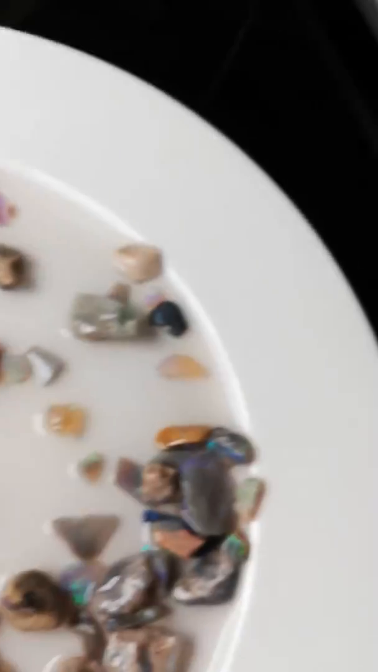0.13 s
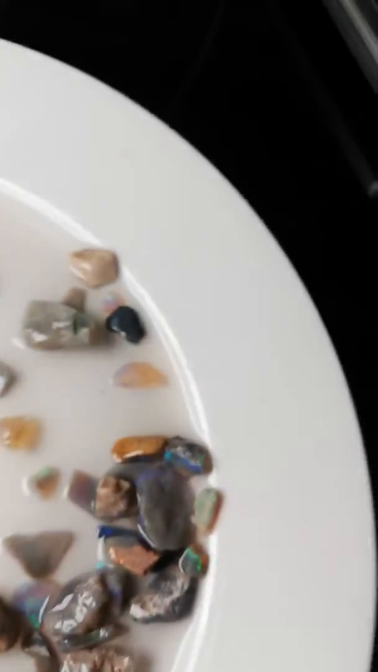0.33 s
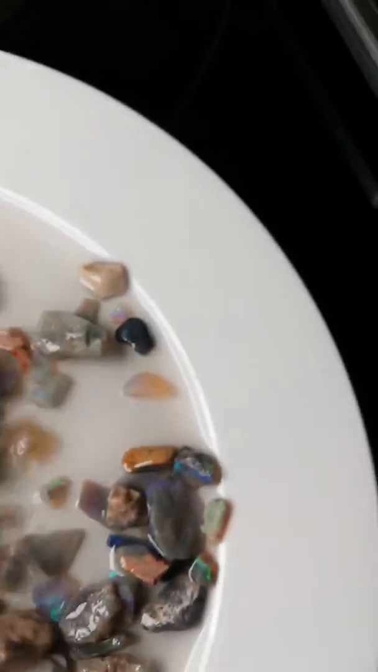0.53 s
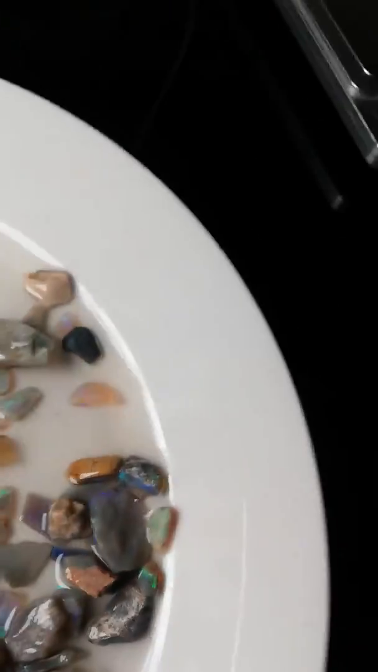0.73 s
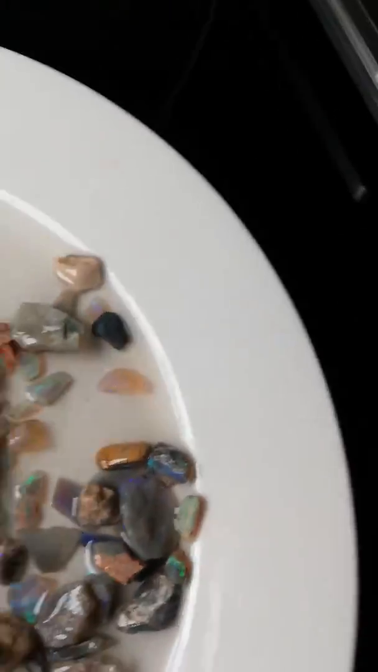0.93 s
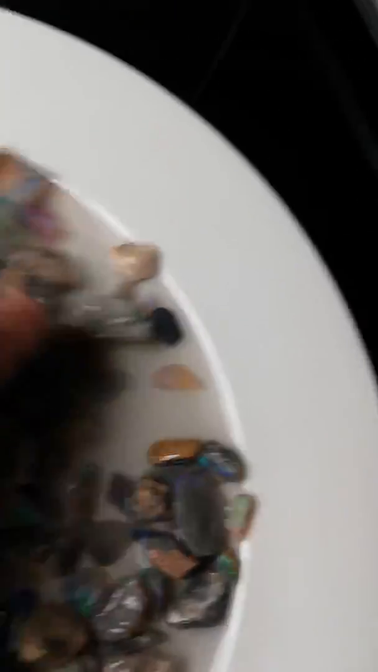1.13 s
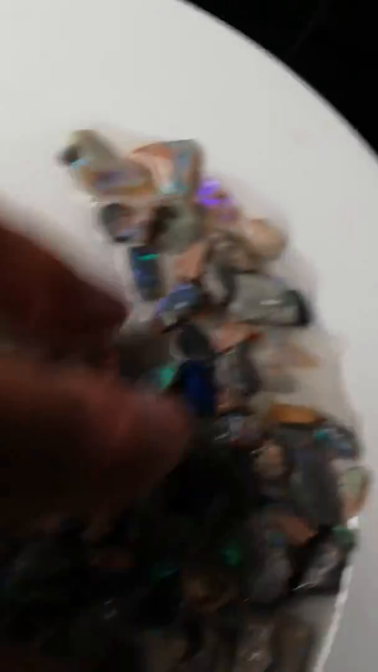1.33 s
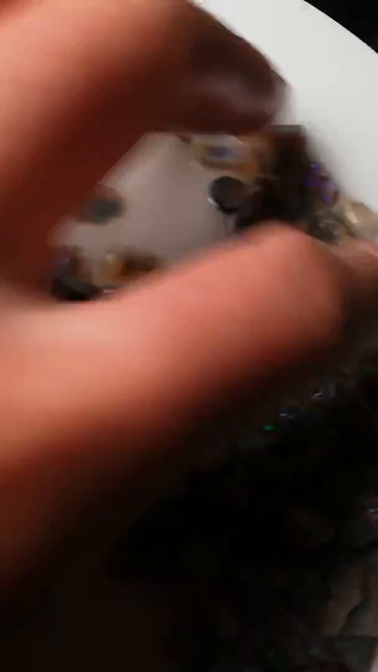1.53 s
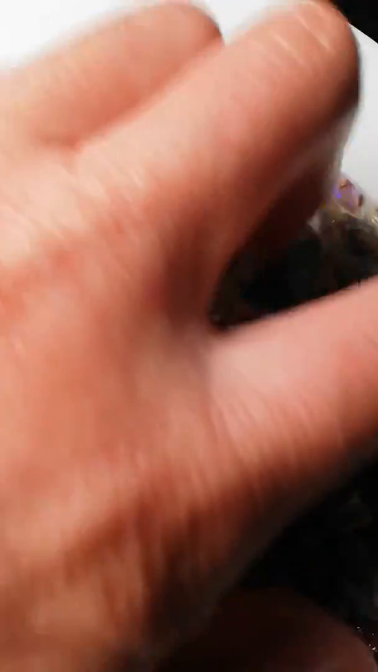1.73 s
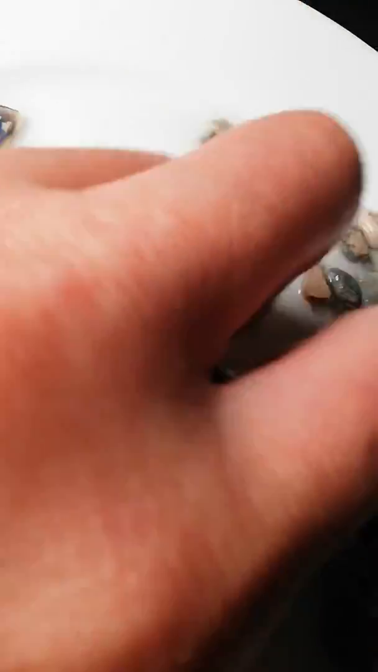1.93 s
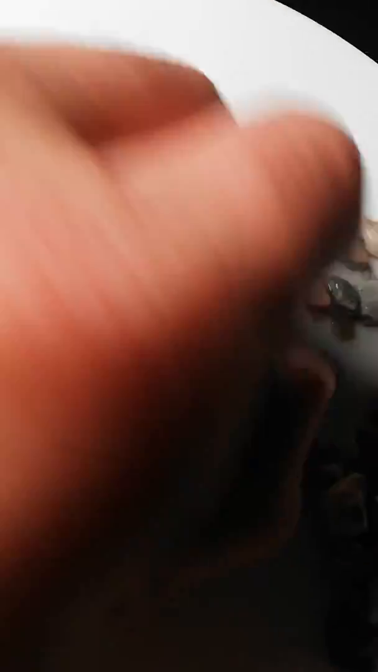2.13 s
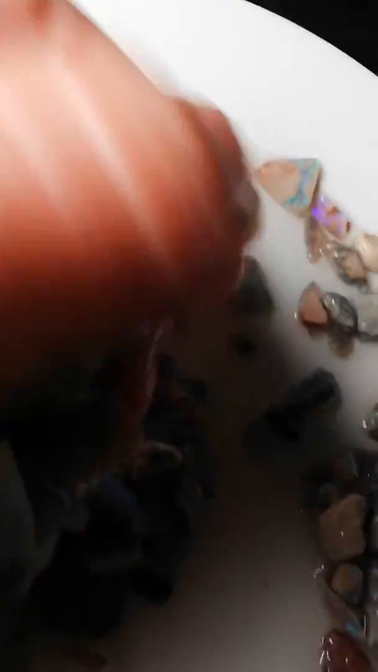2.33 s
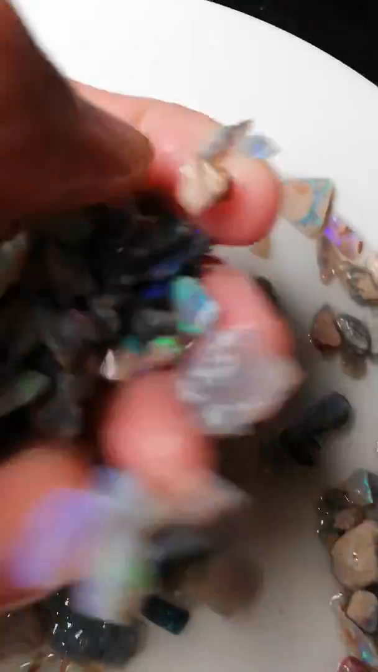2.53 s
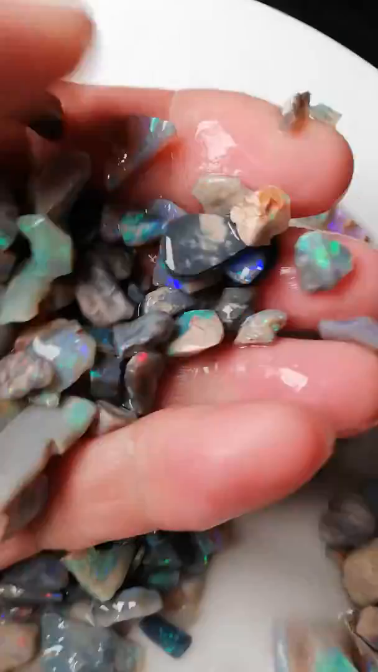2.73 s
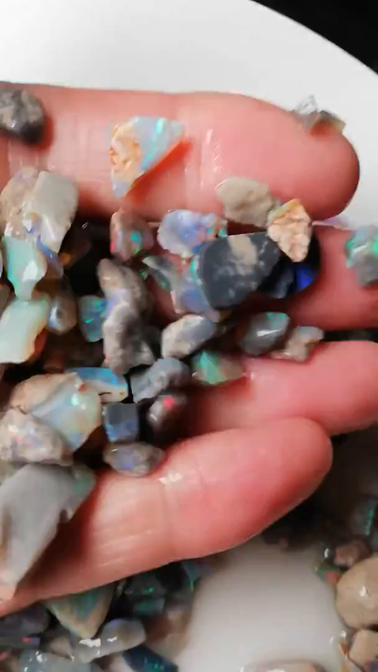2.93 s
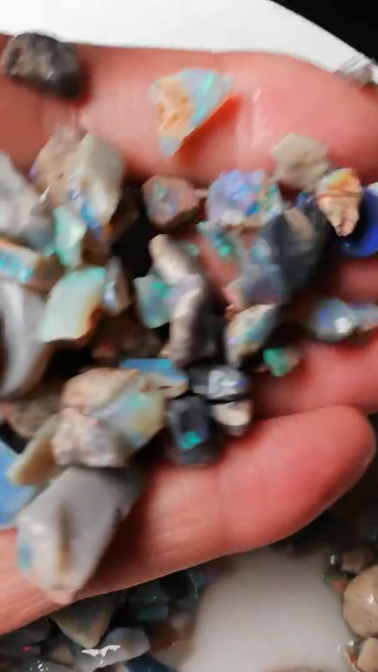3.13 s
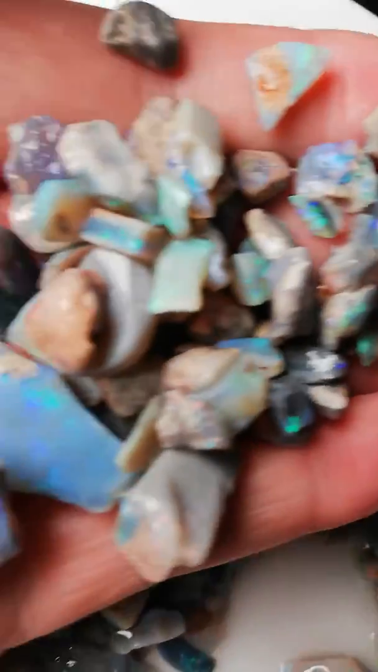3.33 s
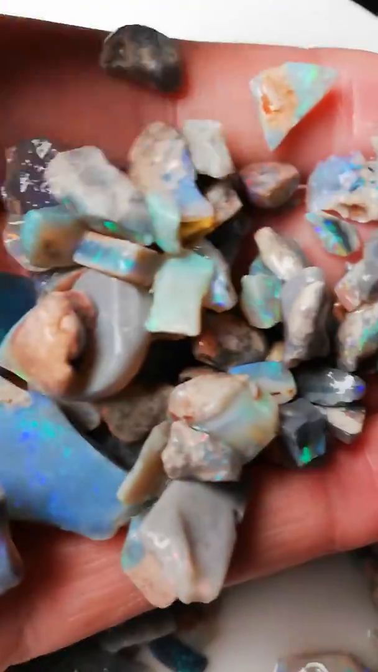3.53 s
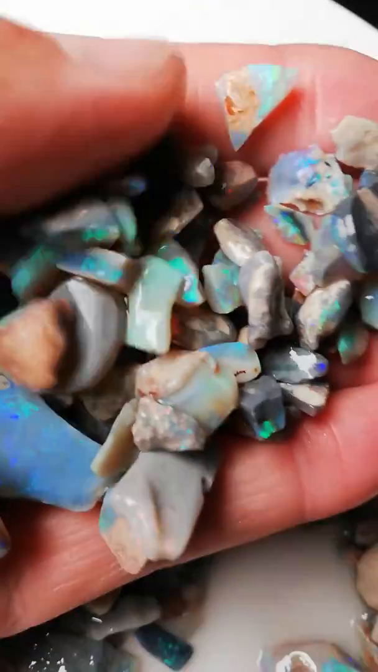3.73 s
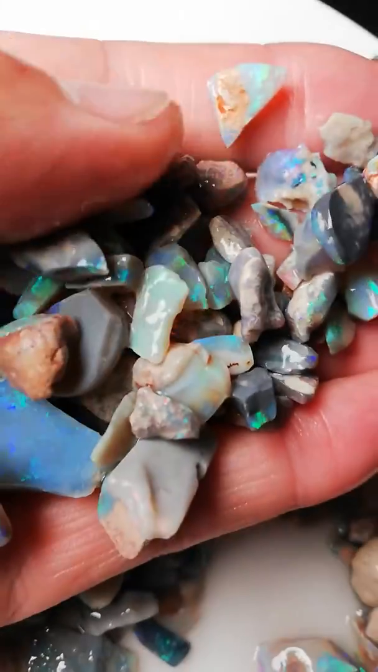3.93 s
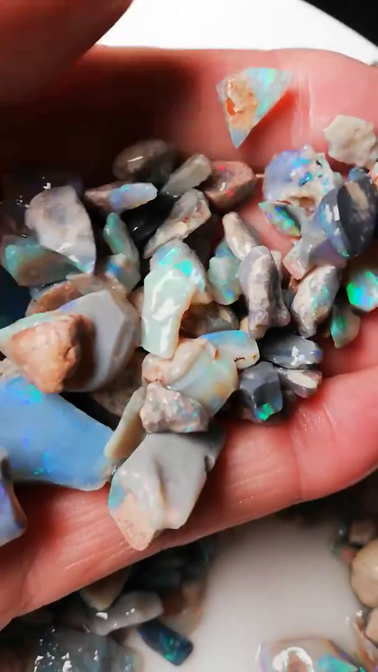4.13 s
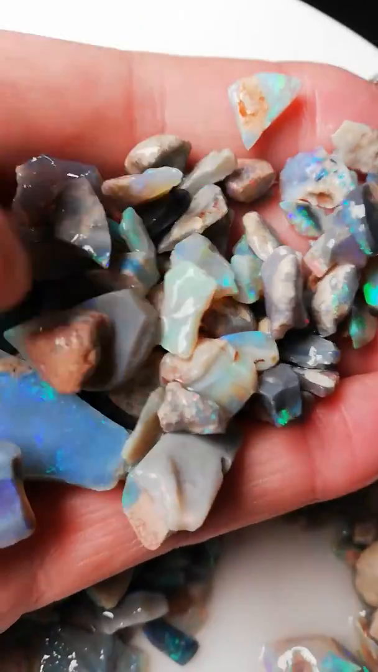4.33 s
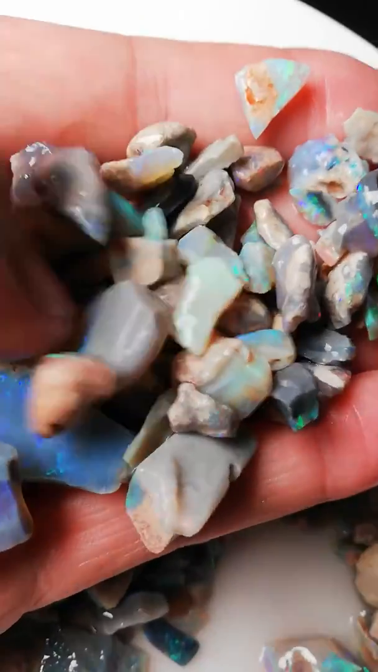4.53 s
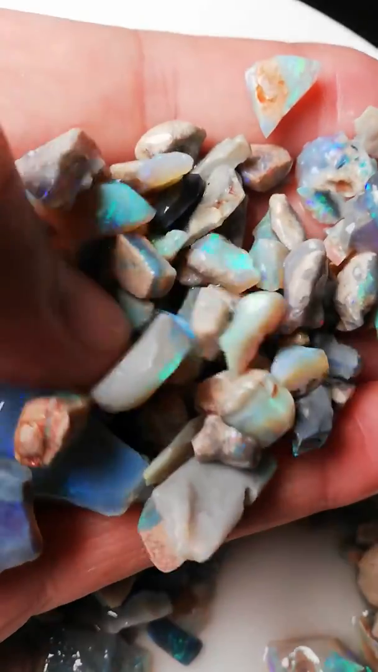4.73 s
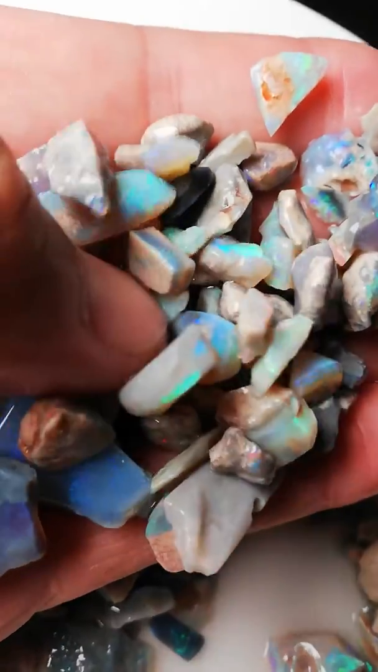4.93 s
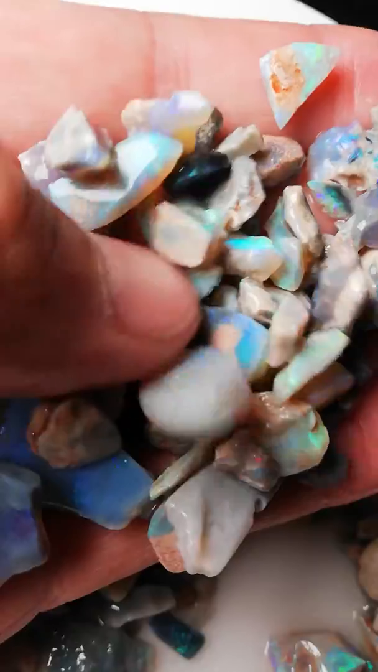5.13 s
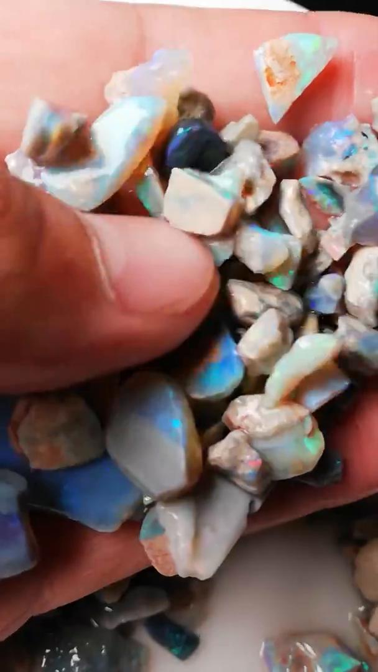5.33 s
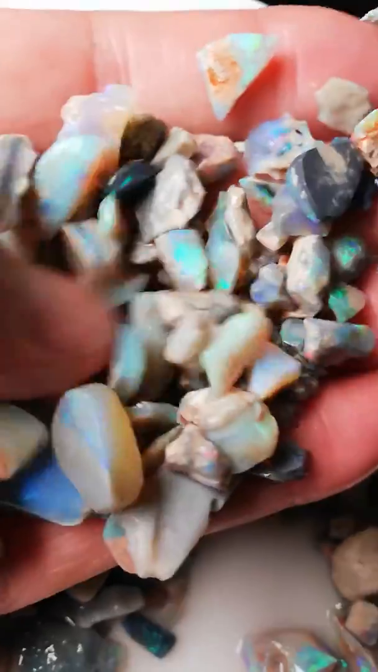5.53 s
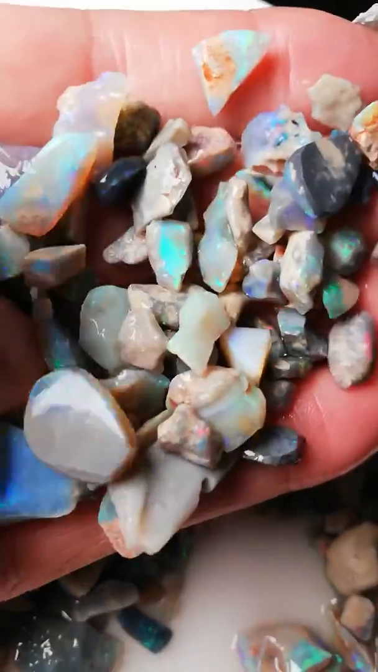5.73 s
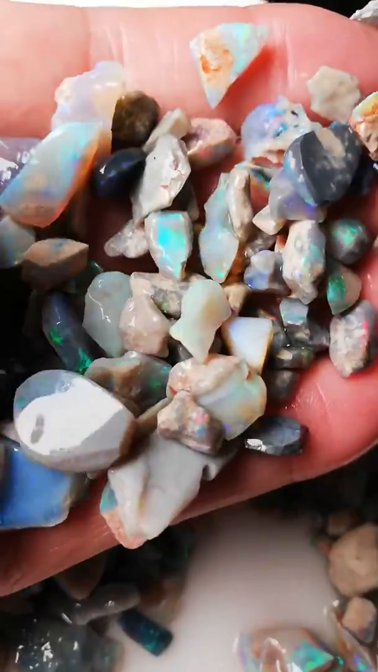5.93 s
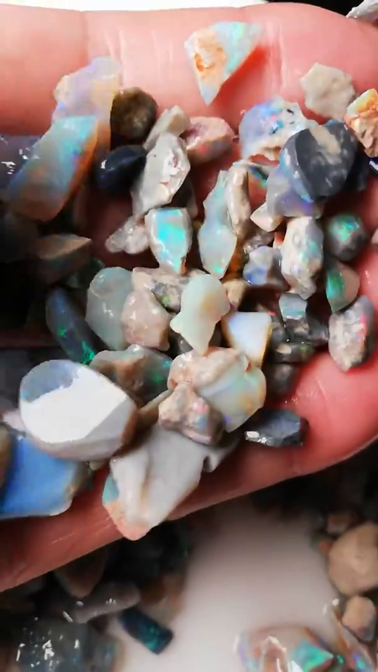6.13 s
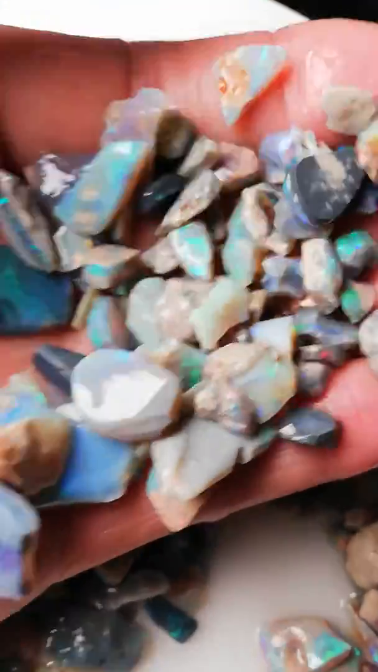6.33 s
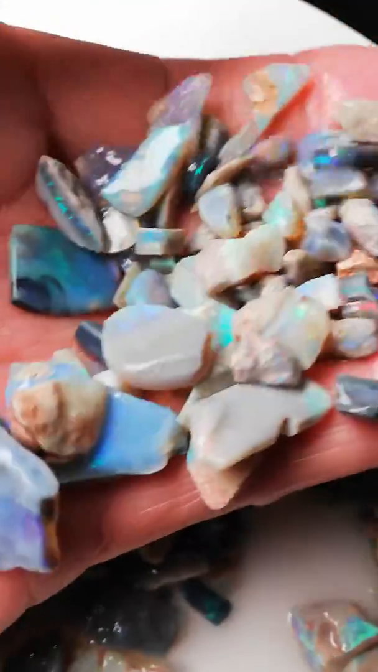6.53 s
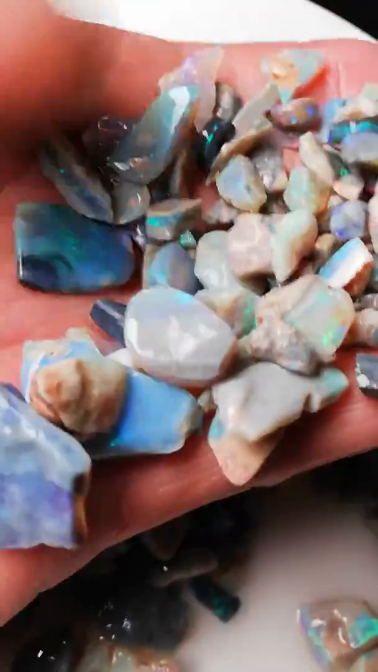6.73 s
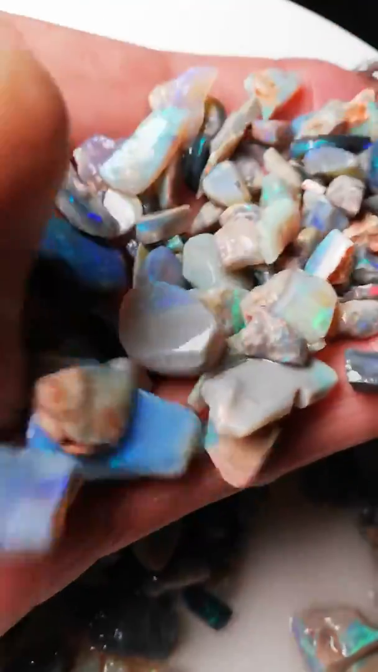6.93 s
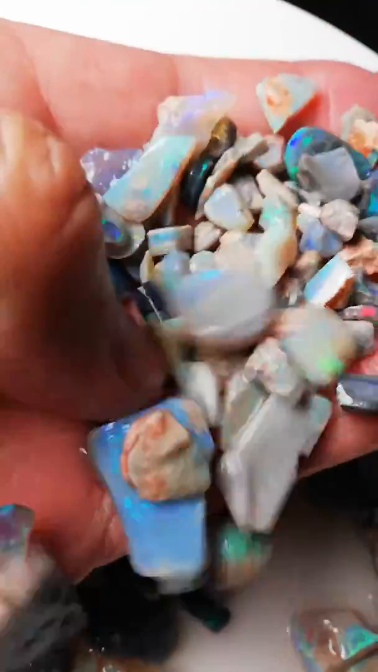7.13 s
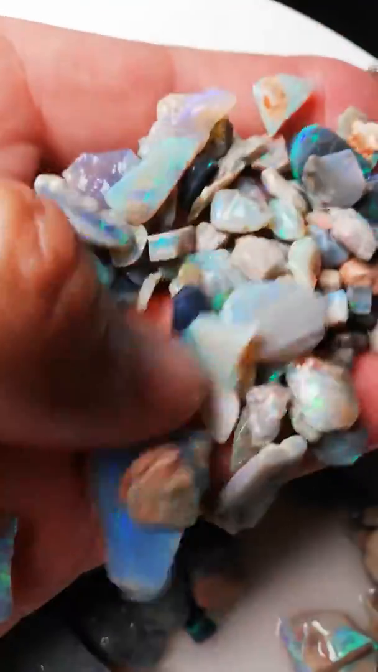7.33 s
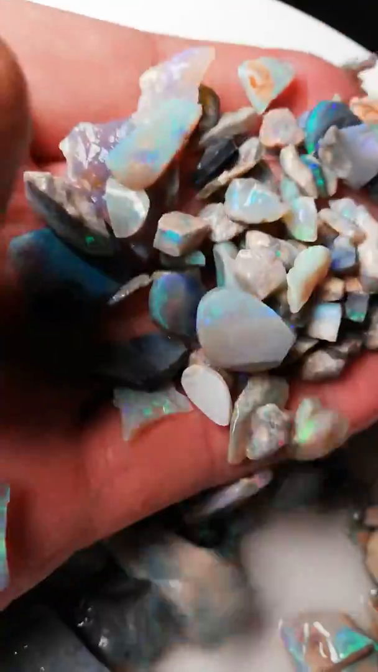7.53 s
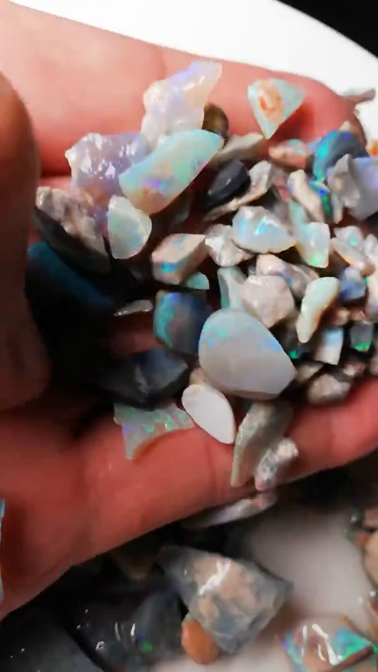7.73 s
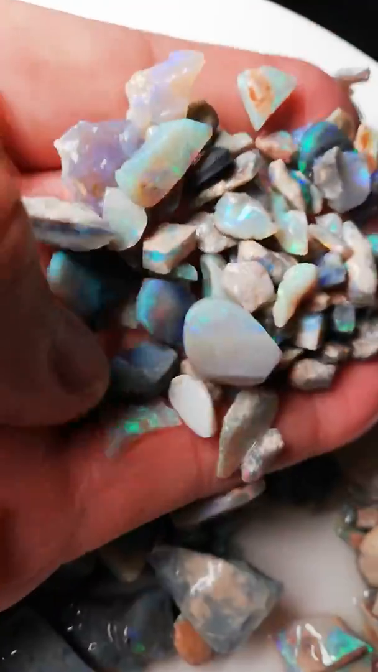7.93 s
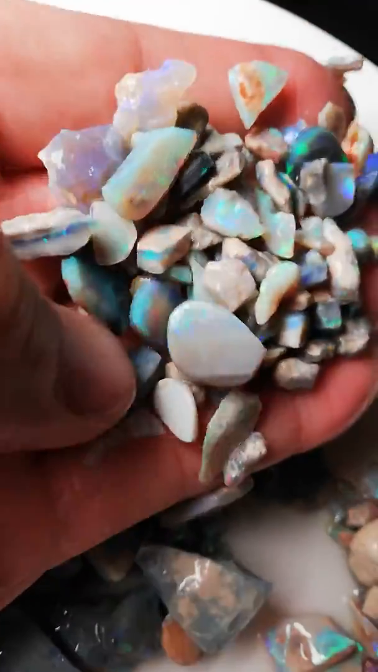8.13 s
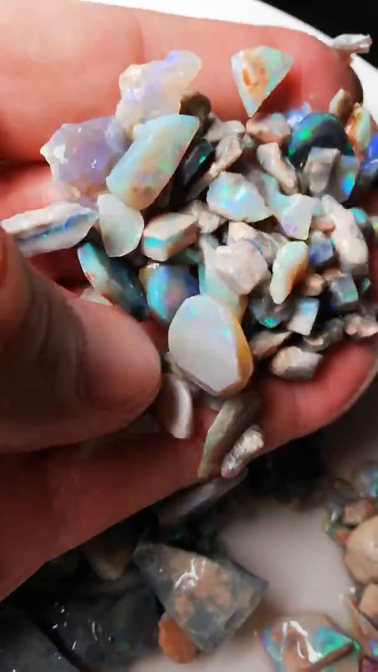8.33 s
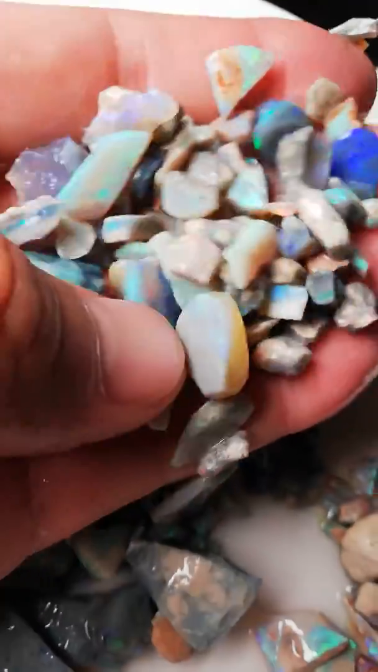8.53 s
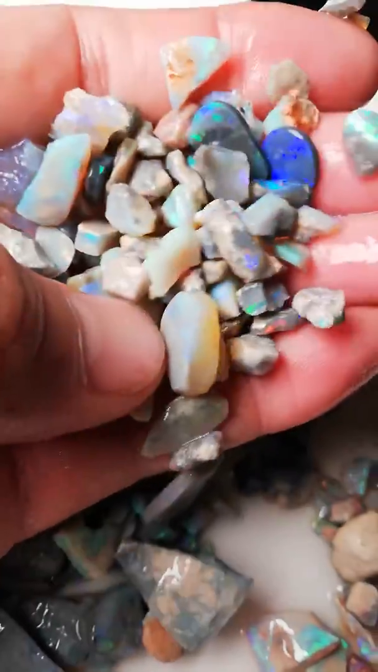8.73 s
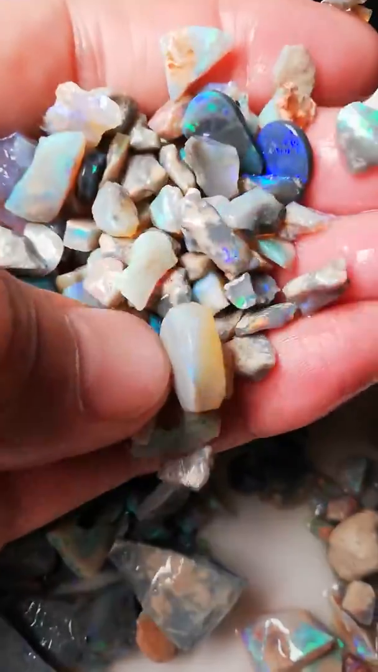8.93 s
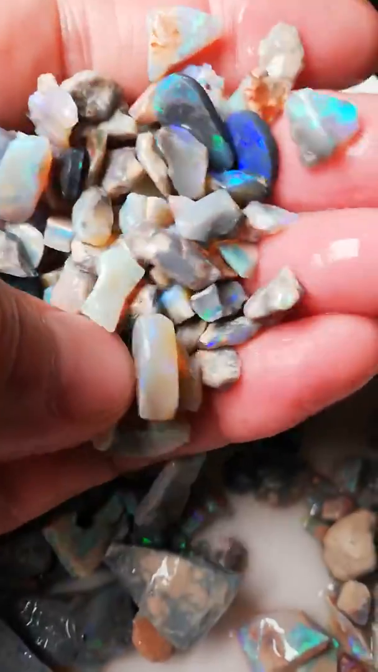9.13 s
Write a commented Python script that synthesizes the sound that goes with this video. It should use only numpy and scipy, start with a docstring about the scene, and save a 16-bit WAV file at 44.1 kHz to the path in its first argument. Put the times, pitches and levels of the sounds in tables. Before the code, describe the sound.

Close to the microphone in a quiet room, a hand sweeps up a heap of little stones, which scrape, rattle and fall clinking on a ceramic plate. The busy clatter gives way to delicate, high clicks and brief gritty rustles as the handful is rolled in the palm. Late on, a short spill strikes the plate loudly, then the soft stirring resumes and a last few pieces land lightly.

```python
"""Small hard stones are pushed over a ceramic plate, scooped up and stirred in a palm.
They tick against each other; those that slide or drop on the plate ring its many short modes,
and the table rumbles under the push. Heard close up in a quiet room,
on a phone's two microphones a hand's width apart."""
import sys
import numpy as np
from scipy import signal
from scipy.fft import rfft, irfft
from scipy.io import wavfile
from scipy.ndimage import uniform_filter1d

SR = 44100
rng = np.random.default_rng(int(sys.argv[2]) if len(sys.argv) > 2 else 0)


def store_wav(level_fs):
    """Save 16-bit WAV to argv[1]."""
    pcm = np.round(np.clip(np.atleast_2d(level_fs), -1, 1) * 32767)
    wavfile.write(sys.argv[1], SR, pcm.T.astype(np.int16))


N = 405279
TIME_S = np.arange(N) / SR
STROKE_STEP_S = 0.002

def amp(db):
    return 10 ** (np.asarray(db) / 20)

def unit_rms(x):
    return x / np.sqrt(np.mean(x ** 2) + 1e-20)

def at_hz(curve, hz):
    curve_hz, value = np.transpose(curve)
    return np.interp(np.log(hz + 1), np.log(curve_hz + 1), value)

def coloured(x, spectrum):
    size = x.shape[-1]
    return irfft(rfft(x) * amp(at_hz(spectrum, np.fft.rfftfreq(size, 1 / SR))), size)

def wander(samples):
    return unit_rms(uniform_filter1d(rng.standard_normal(N), samples))

def burst(spectrum, t60_s, size):
    """A shock of coloured noise at both microphones, dying at once."""
    t = np.arange(size) / SR
    noise = coloured(rng.standard_normal((2, size)), spectrum)
    shock = noise * amp(-60 * t / t60_s) * np.minimum(t / 0.00031, 1)
    return shock / np.linalg.norm(shock[0])

def placed(events, voice):
    """One sound per row, scaled by its peak; pan_db is left minus right throughout."""
    track = np.zeros((2, N))
    for start_s, level_db, pan_db, *timbre in events:
        sound = voice(*timbre)
        sound = amp(level_db) * amp([[pan_db / 2], [-pan_db / 2]]) * sound / abs(sound).max()
        span = track[:, round(start_s * SR):][:, :sound.shape[1]]
        span += sound[:, :span.shape[1]]
    return track

def strokes(start_s, crest_s, end_s, attack, swell, sag, release):
    """One gain curve per stroke; the four slopes are in dB per second."""
    t = np.arange(0, N / SR, STROKE_STEP_S)[:, None]
    rise_db = attack * np.maximum(start_s - t, 0) + swell * np.maximum(crest_s - t, 0)
    fall_db = sag * np.maximum(t - crest_s, 0) + release * np.maximum(t - end_s, 0)
    return amp(-rise_db - fall_db).T

def envelope(shapes, gains):
    """Strokes summed in power, as a gain per sample."""
    total = np.sqrt(((shapes * gains[:, None]) ** 2).sum(0))
    return np.interp(TIME_S, np.arange(len(total)) * STROKE_STEP_S, total)

def rattle(gain, sounds, per_s, spread_db):
    """Random contacts, mostly small; the same few stones keep touching until others take over."""
    strength = amp(spread_db * np.minimum(rng.exponential(1, N), 5))
    hits = gain * unit_rms(strength * (rng.random(N) < per_s / SR))
    spot = 0.33 * wander(round(0.035 * SR)) + 0.08 * rng.standard_normal(N)
    stone = np.floor((spot + 0.5) % 1 * len(sounds))
    return sum(signal.oaconvolve((hits * (stone == k))[None], sound, axes=1)[:, :N]
               for k, sound in enumerate(sounds))

# Room tone spectrum: freq_hz, level_db
ROOM_TONE = [(12, -12.5), (20, -4), (65, -10), (382, -20), (816, -20), (1560, -23.5), (3520, -21),
             (5520, -21.5), (8650, -24.5), (15200, -32), (16500, -49.5)]
# Its likeness between the microphones: freq_hz, correlation
TONE_LIKENESS = [(30, 0.93), (100, .9), (290, -0.25), (640, -0.81), (1400, 1), (6000, -0.055)]
def room_tone():
    """Room air and microphone hiss, nearly alike on both sides in the bass."""
    left, other = rfft(rng.standard_normal((2, N)))
    hz = np.fft.rfftfreq(N, 1 / SR)
    likeness = np.clip(at_hz(TONE_LIKENESS, hz), -1, 1)
    right = likeness * left + np.sqrt(1 - likeness ** 2) * other
    return amp(-64.5) * unit_rms(irfft(np.array([left, right]) * amp(at_hz(ROOM_TONE, hz)), N))

# Modes of the plate: pitch_hz, level_db, base_t60_s
PLATE_MODES = [(830, -20, .06), (1115, -5, .06), (1295, -6, .06), (1840, -10, .05), (2050, -8, .05),
               (2315, -3, .07), (3665, -7, .09), (3910, -4, .1), (4770, -3, .12), (5040, -3, .09),
               (5520, -6, .09), (6030, -6, .06), (6320, -7, .1), (6520, -3.5, .06), (7120, -4, .07),
               (7460, -5, .07), (7760, -2.5, .18), (8960, -8, .07), (9430, -2.5, .12), (9530, -2.5, .12),
               (9990, -4, .07), (11420, -10, .06), (11820, -6, .07), (13750, -20, .05)]
# First shock of stone on ceramic: freq_hz, level_db
CRACK_SPECTRUM = [(290, -64), (500, -60), (1200, -5), (1650, -5.5), (2250, 4.5), (2850, -9), (3500, -4),
                  (7820, -14), (8930, -5.5), (9740, -7), (15100, -18), (16500, -59)]
def plate_ring(low_db, crack_db, hold, favoured_hz=0, favour_db=10, lift_from_hz=0, tuning=1, size=8000):
    """Each spot struck wakes its own mix of modes, and each microphone hears them from its own side."""
    hz, mode_db, t60_s = np.transpose(PLATE_MODES)[:, None, :, None]
    spot, load, side, phase = rng.standard_normal((4, 2, len(PLATE_MODES), 1))
    t = np.arange(size) / SR
    favour = np.exp(-((hz - np.array(favoured_hz)) / 150) ** 2).max(-1, keepdims=True)
    is_low = (hz > lift_from_hz) & (hz < 2800)
    mode_db = mode_db + 4 * spot[:1] + 3 * side + low_db * is_low + favour_db * favour
    hz = hz * tuning * (1 + 0.004 * load[:1])  # stones lying on the plate shift its modes
    drain = 0.31 + 0.45 * favour + amp(-60 * t / 0.01)  # the heap soaks up energy at once
    fade = amp(-60 * t / (hold * t60_s)) * drain
    modes = amp(mode_db) * fade * np.sin(2 * np.pi * hz * t + 1.83 * phase)
    ring = modes.sum(1) * np.minimum(t / 0.00023, 1)
    crack = [(f, db + low_db * (lift_from_hz < f < 2500)) for f, db in CRACK_SPECTRUM]
    return ring / np.linalg.norm(ring[0]) + amp(crack_db) * burst(crack, t60_s=0.038, size=size)

# Stones landing on the plate: start_s, level_db, pan_db, low_lift_db, favoured_hz
LANDINGS = [(0.0996, -11, -7.5, 2.5, 4200), (0.1349, -22, -8, 2, 7000), (0.1609, -20, -4.5, 0, 4660),
            (0.364, -11, -6, 1, 4730), (0.709, -31, 0, 8, 5040), (1.038, -6.5, -4, -6, 4770),
            (1.4494, -7.5, -5.5, -0.5, 6350), (1.4677, -12.5, -18.5, -1.5, 6550),
            (1.6554, -4.5, 0.5, -17.5, 7450), (2.2712, -9, -4, 0, 5650), (2.3224, -16, 1.5, -4, 6500),
            (2.4671, -7, -3, 8.5, 5300), (2.5167, -5, -13, -9, 8350), (2.5579, -2.5, -5.5, -6.5, 4017),
            (2.596, -11, -2.5, -8, 5040), (2.6442, 2, -4.5, -2, 4900), (2.657, -7, -2, -3, 5200),
            (2.6726, -2, -1, -11, 4930), (2.7157, -10, -0.5, -2.5, 3900), (2.748, -9.5, -5.5, -24, 4900),
            (2.779, -9.5, 3, -28, 4920), (2.805, -14.5, 1.5, 2.5, 2315), (2.9329, -3.5, -3, 1.5, 6520),
            (2.9396, -5.5, -7, -21, 7715), (3.014, -11, -11.5, -2.5, 5040), (3.0246, -12, 0, -11, 7770),
            (7.2248, -2, -3, 4.5, 6470), (7.2654, -0.5, -6, 5.5, 7760), (7.2963, -15, -6, -11.5, 7860),
            (7.3057, -12, -6.5, -5.5, 6600), (7.3134, -10.5, -3, -3, 7900), (7.3438, -19.5, 17.5, -6, 7500),
            (7.3546, -8, -9.5, -4, 8000), (7.533, -17, -4, 14, 7530), (7.5466, -13, 2, 15.5, 4840),
            (7.5694, -7.5, -6, 8, 6130), (7.584, -11, -2.5, 9, 2315), (7.6127, -9, -2.5, 3.5, 6030),
            (7.7751, -8.5, 0, 5.5, 5120), (9.0683, -22.5, -2, 13, 7680), (9.0762, -14, 0.5, 2, 9370),
            (9.1166, -13.5, -2.5, 2, 6030), (9.141, -22, -5, -3, 9480), (9.151, -21.5, -2, -2, 9540), ]
def landing(low_db, favoured_hz):
    """A dropped stone cracks on the plate and sets it ringing."""
    return plate_ring(low_db, crack_db=-8, hold=0.85, favoured_hz=favoured_hz, favour_db=8,
                      lift_from_hz=1150)

# Spectrum of the table under the plate: freq_hz, level_db
TABLE_SPECTRUM = [(12, -23), (20, -2), (226, -7), (375, -10), (700, -12.5), (910, -27), (1540, -120)]
def table_thud(*_):
    """The table answers a landing with a low puff."""
    return burst(TABLE_SPECTRUM, t60_s=0.12, size=4000)[:1]

# Course of the rumble: time_s, level_db
PUSH_LEVEL = [(0.301, -90), (0.377, -47.5), (0.79, -79), (0.988, -55), (1.467, -68.5), (1.85, -47.5),
              (1.878, -61), (2.113, -61.5), (2.281, -77.5), (2.68, -64.5), (2.899, -84)]
def table_rumble():
    """The pushed plate makes the table rumble, nearly alike at both microphones."""
    time_s, level_db = np.transpose(PUSH_LEVEL)
    pushing = (TIME_S > time_s[0]) & (TIME_S < time_s[-1])
    common, side = coloured(rng.standard_normal((2, N)), TABLE_SPECTRUM)
    rumble = unit_rms(np.array([common + 0.15 * side, common - 0.087 * side]))
    return amp(np.interp(TIME_S, time_s, level_db)) * pushing * rumble

# Brief surges: small avalanches in the heap, and two dull low taps near 4 s: time_s, lift_db
BRIEF_SURGES = [(.37, 7), (.423, 1.5), (.439, -0.5), (0.478, 5), (0.523, 4), (1.085, 3.5), (1.131, -5),
                (1.215, 2), (1.245, 3), (1.383, 13.5), (1.741, 4), (1.826, 3), (1.866, 0), (1.93, 5.5),
                (2.053, 4), (2.148, 5), (4.024, 6.5), (4.112, 8.5)]
def slipping():
    """The wavering gain of stones that slip unevenly, with brief surges on top."""
    surge_db = sum(db * np.exp(-((TIME_S - time_s) / 0.011) ** 2) for time_s, db in BRIEF_SURGES)
    return amp(surge_db + 1.2 * wander(samples=500))

# The heap moving on the plate; the row near 4 s carries the two dull taps:
# start_s, crest_s, end_s, rattle_db, knock_db, plate_share, pan_db
HEAP_SLIDES = [(0.361, 0.57, 0.58, -27.5, -36.5, 0.95, -4.5), (0.807, 0.85, 0.8, -38.5, -48, 0.94, -5.5),
               (0.951, 1.22, 1.338, -24, -36.5, 0.75, -4), (1.45, 1.48, 1.524, -32.5, -47, 1, -1),
               (1.641, 1.863, 1.894, -24, -36.5, 0.71, -3), (1.91, 2.02, 2.243, -25, -37.5, 0.9, 1),
               (2.317, 2.332, 2.33, -27, -41.5, 0.25, -1.5), (2.459, 2.52, 2.57, -32, -40, 0.95, -2),
               (2.634, 2.73, 2.794, -30.5, -45, 0.97, -2), (3.996, 4.02, 4.28, -85.5, -63, 1, 8),
               (7.223, 7.292, 7.49, -38.5, -56, 0.92, -1), (7.599, 7.62, 7.61, -34, -41.5, 0.9, -2.5),
               (7.777, 7.786, 7.72, -32.5, -49, 0.92, -4)]
def sliding_heap(slip):
    """Stones tick together, scrape the plate and knock its low modes; returns sound and strokes."""
    start_s, crest_s, end_s, rattle_db, knock_db, plate_share, pan_db = np.transpose(HEAP_SLIDES)
    shapes = strokes(start_s, crest_s, end_s, attack=5500, swell=33.7, sag=40, release=170)
    ticks = [stone_tick(hz, t60_s=0.011) for hz in np.geomspace(3400, 11500, 16)]
    rings = [plate_ring(low_db=-11, crack_db=-9, hold=0.6, tuning=tuning, size=4000)
             for tuning in np.linspace(0.975, 1.005, 12)]
    knocks = [plate_ring(low_db=26, crack_db=-9, hold=0.45, favoured_hz=[1150, 2200], favour_db=7,
                         tuning=tuning, size=3000) for tuning in np.linspace(0.95, 1, 8)]
    on_stones = envelope(shapes, amp(rattle_db) * np.sqrt(1 - plate_share ** 2))
    on_plate = envelope(shapes, amp(rattle_db) * plate_share)
    sound = (rattle(slip * on_stones, ticks, per_s=1900, spread_db=3)
             + rattle(slip * on_plate, rings, per_s=1200, spread_db=2.5)
             + rattle(slip * envelope(shapes, amp(knock_db)), knocks, per_s=1500, spread_db=2))
    return sound, (shapes, np.maximum(rattle_db, knock_db), pan_db)

# One small stone rocking on the bare plate: start_s, level_db, pan_db
ROCKING_TOUCHES = [(0.809, -20.5, -9.5), (0.838, -26, -8), (0.868, -30, -7)]
def rocking_stone():
    """A soft touch makes the plate sing in two clear modes."""
    ring = plate_ring(low_db=0, crack_db=-18, hold=1.1, favoured_hz=[5040, 6320], favour_db=14)
    t = np.arange(ring.shape[1]) / SR
    return ring * np.minimum(t / 0.0034, 1)

# Spectrum of stone against stone: freq_hz, level_db
STONE_SPECTRUM = [(710, -70.5), (1200, -31), (1800, -7.5), (2550, -17), (3200, -2.5), (3800, -4), (4800, 2),
                  (7010, 5), (9750, 4.5), (15100, -14.5), (16500, -45.5)]
# Single ticks: start_s, level_db, pan_db, pitch_hz
STONE_TICKS = [(1.268, -7, -2.5, 8900), (1.859, -6.5, -6, 7800), (1.9626, -11.5, -5.5, 9300),
               (2.0484, -4, 5, 1970), (2.1078, -21, 0, 6750), (2.1417, -11.5, 5, 5670),
               (2.2131, -13.5, -2, 4450), (3.517, -38, 16, 7200), (3.7199, -21, -5, 9240),
               (3.906, -20.5, 2, 8230), (4.0764, -22.5, 0, 8760), (4.523, -30, -2, 8600),
               (4.8041, -26, 5, 9270), (4.889, -38, 0, 8600), (5.107, -39, 3, 11400),
               (5.2195, -19.5, -6, 11400), (5.2227, -23.5, -13.5, 9000), (5.7361, -23.5, 2, 4980),
               (5.761, -24, 6, 9500), (5.8461, -18, 9, 7700), (5.9107, -30, 9, 8360),
               (6.342, -24.5, 3, 7300), (6.4637, -24.5, 5.5, 9530), (6.5539, -32, 11, 8560),
               (6.9703, -19, 6, 7500), (6.978, -22.5, 1, 3360), (7.103, -23.5, -2, 9400),
               (7.2006, -34, 1, 6420), (8.6297, -30.5, -5, 8550), (8.646, -26.5, 9.5, 2960),
               (8.8909, -26, -8, 9600), (8.9448, -33.5, -7, 12400), (9.021, -34, -2, 11000),]
def stone_tick(pitch_hz, focus_db=12, t60_s=0.014, size=1500):
    """Two stones meet: a snap gathered round one pitch and a brief ring, later on the right."""
    t = np.arange(size) / SR
    ring = amp(-60 * t / 0.06) * np.sin(2 * np.pi * pitch_hz * t)
    spectrum = [(f, at_hz(STONE_SPECTRUM, f) + focus_db * np.exp(-(np.log(f / pitch_hz) / 0.09) ** 2))
                for f in np.geomspace(700, 16500, 40)]
    left, other = 0.13 * ring / np.linalg.norm(ring) + burst(spectrum, t60_s, size)
    lag = np.zeros(27)  # extra travel to the right microphone
    return np.array([np.r_[left, lag], np.r_[lag, 0.6 * left + 0.7 * other]])

# Stirring in the palm, close to the microphones: start_s, end_s, level_db
THUMB_RUBS = [(3.747, 3.816, -42.5), (3.848, 3.868, -47), (4.023, 4.11, -56), (4.464, 4.527, -58),
              (4.535, 4.577, -42), (4.572, 4.608, -39.5), (4.658, 4.78, -51.5), (4.801, 4.848, -46),
              (4.906, 4.99, -58.5), (5.135, 5.163, -51.5), (5.208, 5.265, -54.5), (5.51, 5.547, -41),
              (5.591, 5.69, -46), (5.727, 5.773, -42.5), (5.806, 5.89, -52), (5.906, 5.942, -49),
              (6.277, 6.358, -57.5), (6.412, 6.457, -53.5), (6.532, 6.589, -49), (6.638, 6.664, -51.5),
              (6.879, 6.91, -59), (6.919, 6.934, -37), (6.99, 7.03, -53), (7.044, 7.133, -42),
              (7.156, 7.187, -39.5), (7.94, 8.423, -60), (8.479, 8.578, -47), (8.616, 8.667, -46),
              (8.805, 8.958, -58.5)]
def thumb_rub(slip, pan_db=4.5):
    """A thumb rolls the stones into a dense rustle of ticks; returns sound and strokes."""
    start_s, end_s, level_db = np.transpose(THUMB_RUBS)
    shapes = strokes(start_s, start_s, end_s, attack=610, swell=0, sag=35, release=620)
    ticks = [stone_tick(hz, focus_db=7, t60_s=0.011) for hz in np.geomspace(4400, 11500, 12)]
    sound = rattle(slip * envelope(shapes, amp(level_db)), ticks, per_s=4000, spread_db=5.5)
    return sound, (shapes, level_db, np.full(len(level_db), pan_db))

def moving_stones():
    """Sliding and rubbing together, leaning to the side of whichever strokes are loudest."""
    slip = slipping()
    slide, slide_strokes = sliding_heap(slip)
    rub, rub_strokes = thumb_rub(slip)
    shapes, level_db, pan_db = map(np.concatenate, zip(slide_strokes, rub_strokes))
    sides = np.array([envelope(shapes, amp(level_db + side * pan_db / 2)) for side in (1, -1)])
    return (slide + rub) * sides / envelope(shapes, amp(level_db))

# Decay of the room: freq_hz, t60_s
ROOM_DECAY = [(800, 0.17), (3000, 0.18), (8000, 0.13), (15000, 0.054)]
def room_reflections(x):
    """Sparse reflections of random sign, each band dying at its own speed."""
    taps = np.zeros((2, SR // 2))
    slots = np.arange(200, SR // 2 - 20, 20)
    arrivals = slots + rng.integers(0, 20, (2, len(slots)))
    np.put_along_axis(taps, arrivals, rng.choice([-1., 1.], arrivals.shape), 1)
    hz, t, bands = signal.stft(taps, SR, nperseg=256)
    tail = signal.istft(bands * amp(-60 * t / at_hz(ROOM_DECAY, hz)[:, None]), SR, nperseg=256)[1]
    return signal.fftconvolve(x, tail / np.linalg.norm(tail[0]), axes=1)[:, :N]

# Colour difference between the microphones: freq_hz, pan_db
MIC_BALANCE = [(600, -1), (1400, 6), (3000, 7), (6000, 4), (9000, -4.5), (13000, 1)]
def scene():
    """Stones, table and room as they reach the two microphones."""
    stones = placed(LANDINGS, landing) + placed(STONE_TICKS, stone_tick)
    stones += placed(ROCKING_TOUCHES, rocking_stone) + moving_stones()
    low_cut = signal.butter(8, 990, "high", fs=SR, output="sos")  # small bodies shed little bass
    direct = signal.sosfilt(low_cut, stones) + amp(-49) * placed(LANDINGS, table_thud)
    left, right = direct + amp(-10) * room_reflections(direct)
    left = coloured(left, [(hz, db / 2) for hz, db in MIC_BALANCE])
    right = coloured(right, [(hz, -db / 2) for hz, db in MIC_BALANCE])
    return np.array([left, right]) + table_rumble() + room_tone()

def record(dry):
    """The phone clips at full scale and cuts the highest treble."""
    low_pass = signal.firwin(511, 16600, window=("kaiser", 9), fs=SR)
    return signal.oaconvolve(np.clip(dry, -1, 1), low_pass[None], "same")

dry = scene()
out = record(dry)
store_wav(out)
```